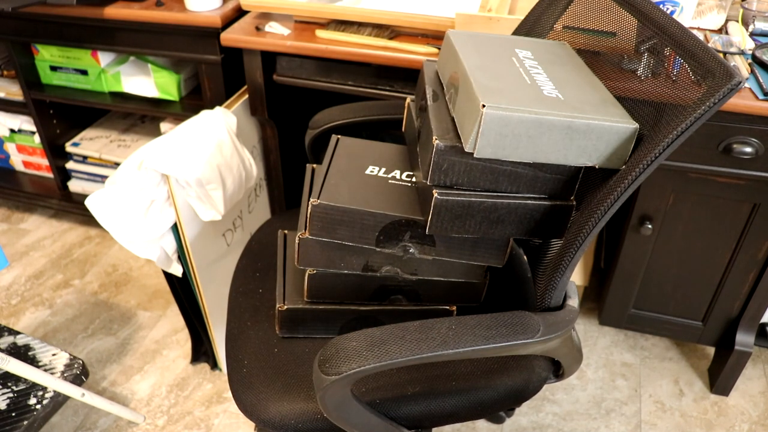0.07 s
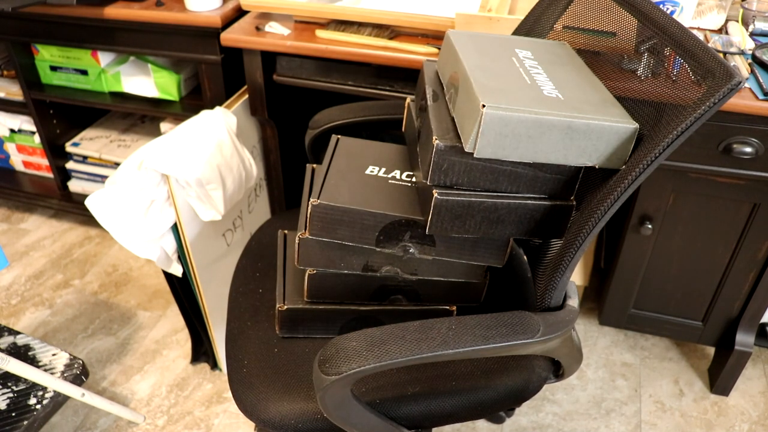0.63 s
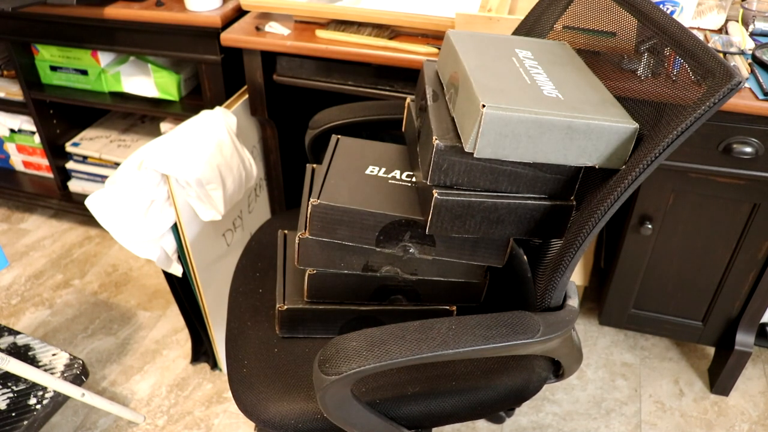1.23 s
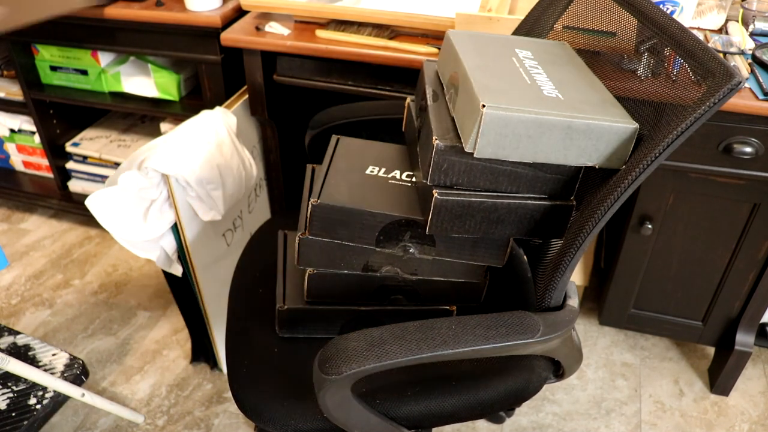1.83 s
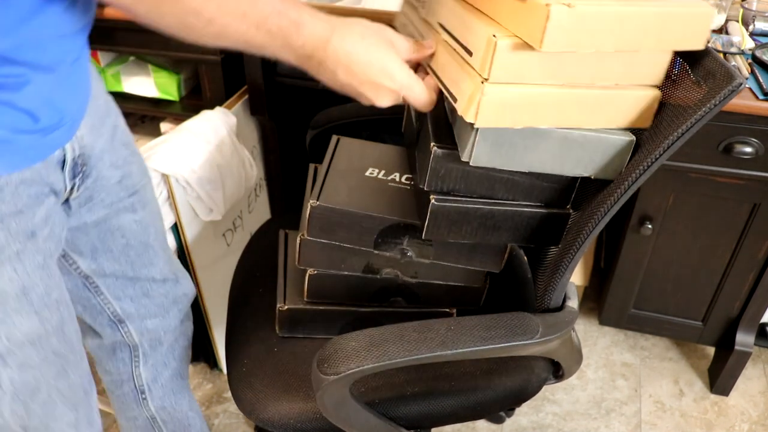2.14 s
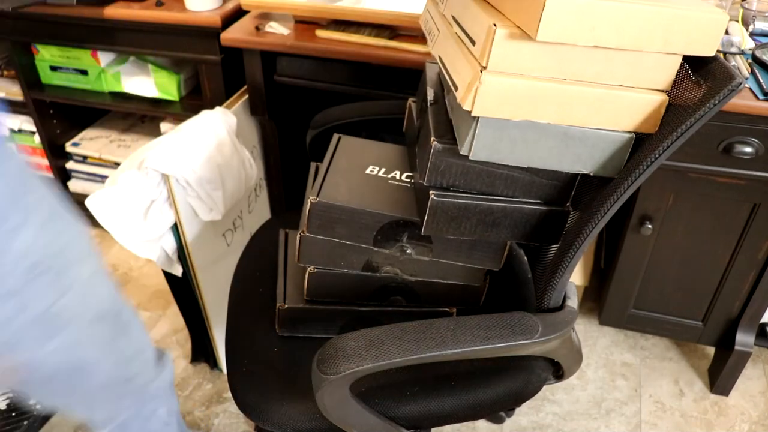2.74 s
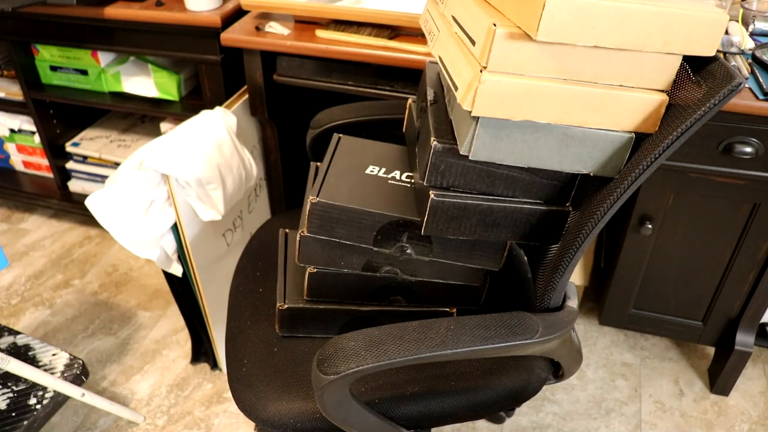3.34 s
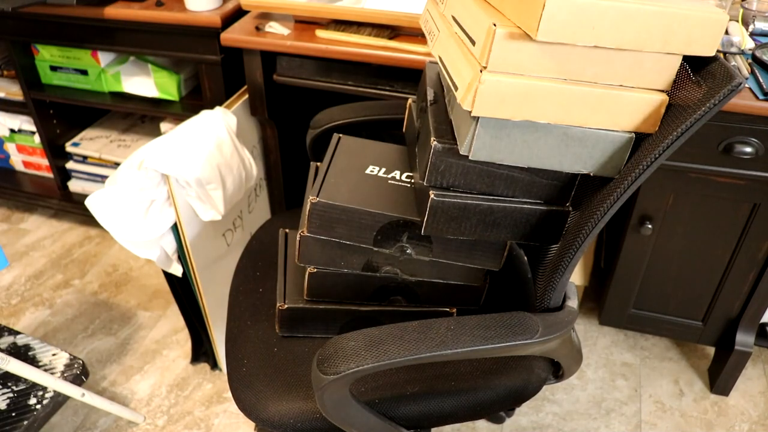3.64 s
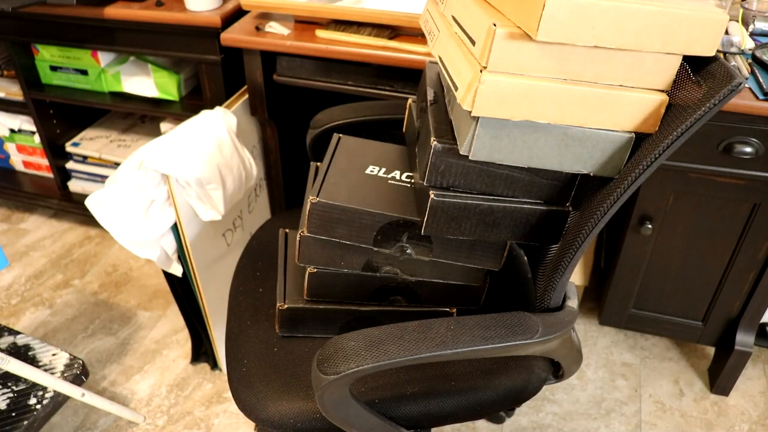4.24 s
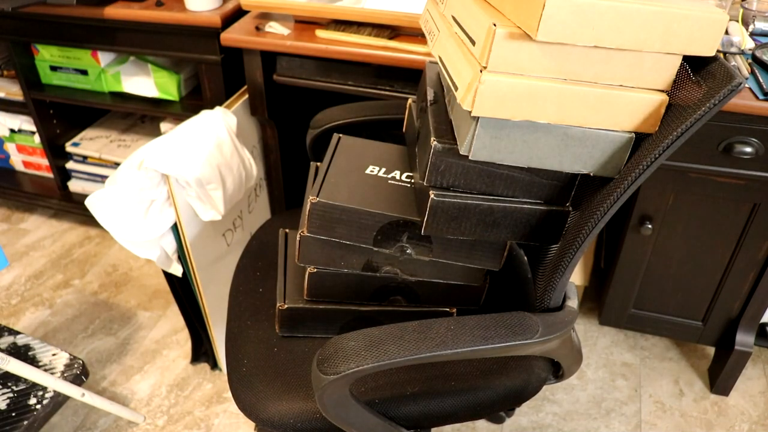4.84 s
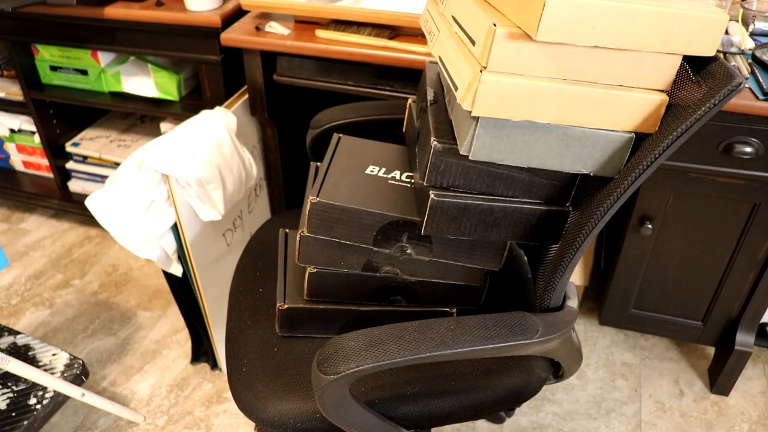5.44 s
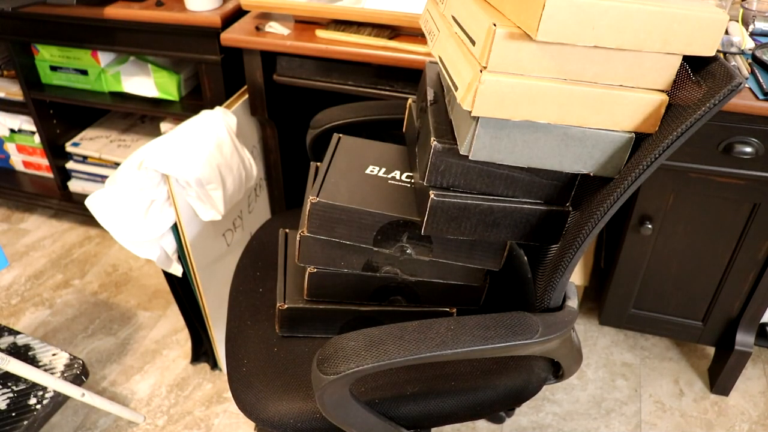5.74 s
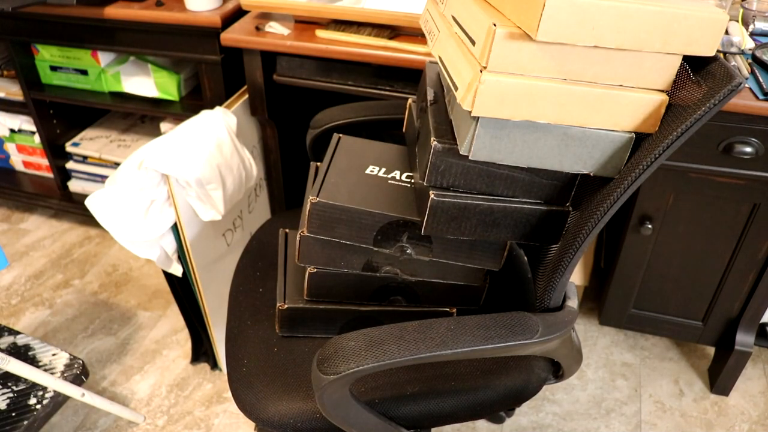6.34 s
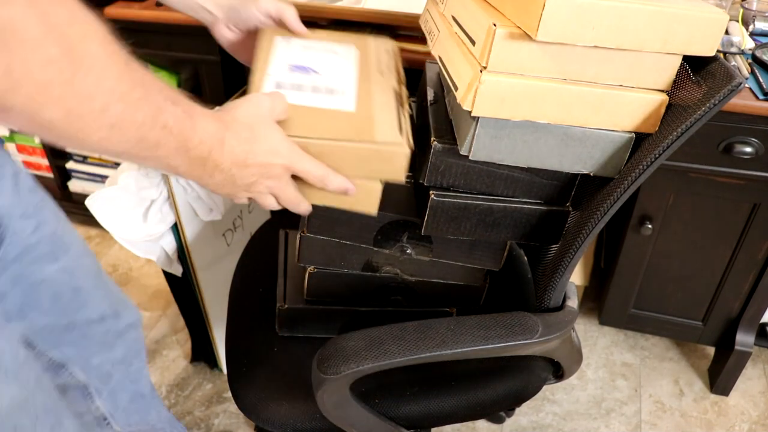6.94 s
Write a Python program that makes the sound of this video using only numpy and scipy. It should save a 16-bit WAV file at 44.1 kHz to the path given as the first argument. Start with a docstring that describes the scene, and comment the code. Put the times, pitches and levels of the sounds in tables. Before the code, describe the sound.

In a small furnished room, someone handles cardboard boxes with light taps, dull bumps and rustling clothes. One box knocks down, card slides with a tiny squeak, and more boxes land on the pile in a quick clatter. After a quieter pause comes another hollow knock, then scattered taps and brushing. A fan hums faintly throughout, and the sound is fairly close and dry.

```python
"""Cardboard boxes are picked up and stacked on an office chair in a small furnished room.
Each hollow blow is a push plus the chatter of card settling on card, coloured by the box, with a
brief panel ring. Light taps, dull bumps and one stick-slip squeak fall in between. Sliding card and
brushing clothes make friction noise, flexing card crackles, and a fan hums steadily behind."""
import sys
import numpy as np
from scipy import signal
from scipy.fft import rfft, irfft, next_fast_len
from scipy.io import wavfile
from scipy.ndimage import uniform_filter1d, map_coordinates

SR = 44100
rng = np.random.default_rng(int(sys.argv[2]) if len(sys.argv) > 2 else 0)


def generate_wav(signal):
    """Clip the signal to [-1, 1] and save it as 16-bit WAV at the path in sys.argv[1]."""
    frames = np.transpose(np.atleast_2d(signal))
    scaled = np.clip(frames, -1, 1) * 32767
    pcm = np.round(scaled).astype(np.int16)
    wavfile.write(sys.argv[1], SR, pcm)


N = 308700

# Panel modes. Each row: frequency in Hz, relative level in dB.
LID_MODES = [(721.4, -43), (1927, -43), (2519, -40), (2972, -50), (3122, -50), (3924, -45)]
STACK_MODES = [(489.9, -40), (651.4, -35), (694.4, -36), (812.9, -38), (936.7, -36), (1130, -39),
               (1308, -34), (1400, -37), (1567, -38)]
# Struck boxes. Each holds: clatter spectrum and panel modes (both rows of Hz, dB), ring T60 in seconds,
# ring level against the clatter in dB, room tail gain in dB.
LID = [(120, -81), (330, -12), (420, -24), (720, 2.5), (1150, -6.5), (2000, 0), (2550, 0), (2900, -7.5),
       (4000, -5.5), (4400, -10.5), (15500, -27.5)], LID_MODES, 0.072, -6, -1.5
STACK = [(25, -36), (70, -30), (300, -28), (420, -12), (620, 0.5), (1050, -4), (1300, -6.5), (2100, -10),
         (4600, -14.5), (11500, -14.5), (15500, -25)], STACK_MODES, 0.096, -1.5, 0.5
FLANK = [(59, -71), (100, -33), (228, -15), (355, -18), (627, -6.5), (758, -16), (998, -4), (1880, -17.5),
         (2090, -10), (2270, -15), (5170, -15), (15500, -20.5)], [(1012, -2), (2089, -9)], 0.066, -13, 3.2
HOLLOW = ([(30, -75), (70, -52), (140, -26), (210, -12.5), (280, -1.5), (376, -8), (486, -3),
           (657, -6.5), (1200, -1.5), (2100, -11.5), (3580, -22.5), (4850, -20), (6710, -35),
           (15500, -61)],
          [(279.9, -38), (500.6, -35), (608.3, -35), (866.7, -33), (1066, -47), (1184, -55),
           (1351, -44), (1427, -57), (1545, -40), (2094, -41), (2326, -38)], 0.082, -9, -1)
# Each row: start in seconds, level in dB, rise in seconds, chatter T60 in seconds, box.
BLOWS = [ (1.278, -20.5, 0.0052, 0.078, LID), (2.1485, -20, .0012, 0.094, STACK),
         (2.1669, -19.5, 0.0013, 0.089, STACK), (2.177, -20, .0054, 0.082, STACK),
         (2.176, -27.5, 0.0061, .2, FLANK), (2.517, -25.5, 0.014, 0.072, FLANK),
         (2.526, -27, 0.0062, 0.051, FLANK), (4.507, -30.5, .004, 0.2, FLANK),
         (4.5266, -17.5, 0.0053, 0.068, HOLLOW), (4.529, -30.5, 0.0016, 0.027, LID),
         (4.548, -24.5, 0.0052, 0.1, HOLLOW)]
# Each row: start in seconds, knock level in dB, panel pitch in Hz, edge tick against the knock in dB.
TAPS = [(0.045, -52, 657, 5), (0.52, -43, 483, -11.5), (0.612, -43, 630, -2), (0.687, -46.5, 1550, -0.5),
        (0.811, -41.5, 625, -5), (1.492, -47, 706, 3.5), (1.603, -40.5, 715, -7), (2.845, -44.5, 610, 8.5),
        (3.083, -43.5, 900, -4), (5.155, -37.5, 1520, -14), (5.414, -42.5, 503, -11),
        (5.609, -46, 1210, -3.5), (5.987, -43, 1160, 0), (6.179, -43.5, 780, -6.5),
        (6.587, -40.5, 650, -24), (6.641, -43.5, 1900, 4), (6.672, -33, 1730, -8.5),
        (6.697, -39.5, 650, -16)]
# Each row: start in seconds, level in dB.
BUMPS = [(0.855, -41), (0.878, -34.5), (5.159, -47)]
# Rubs of hands, card and clothes. Each row: centre in seconds, half-length in seconds, swish in dB.
STROKES = [(0.872, 0.036, -42.5), (1.087, .02, -38.5), (1.42, 0.022, -40), (1.897, 0.039, -37.5),
           (2.084, 0.021, -29.5), (2.244, 0.012, -33), (2.93, 0.013, -37.5), (3.645, 0.024, -51.5),
           (3.86, 0.033, -51.5), (4.697, 0.024, -49.5), (4.786, 0.035, -46.5), (4.947, 0.016, -47.5),
           (5.039, 0.017, -32.5), (5.095, 0.031, -48), (5.139, 0.015, -37.5), (5.337, 0.036, -50.5),
           (5.445, 0.044, -53.5), (5.883, 0.024, -52), (5.98, 0.026, -49), (6.371, 0.026, -43)]
# Body movement: carry, let go, stand still, move again. Each row: time in seconds, rustle level in dB.
EFFORT = [(0.22, -64), (0.35, -51.5), (0.47, -54.5), (0.64, -53), (0.98, -53), (1.33, -44.5), (1.7, -47.5),
          (1.88, -40), (2.01, -47), (2.13, -40), (2.31, -44), (2.41, -63.5), (2.77, -55.5), (3.02, -52.5),
          (3.2, -61.5), (6.12, -58), (6.62, -42), (7.0, -50.5)]
# Each row: time in seconds, pitch in Hz, level in dB.
SQUEAK_PATH = [(1.93, 3600, -70), (1.943, 3500, -47), (1.958, 3100, -41), (1.985, 3450, -49),
               (2.01, 3500, -70)]
# Source spectra; the knock is for a panel at KNOCK_REF_HZ. Each row: frequency in Hz, density in dB.
KNOCK_SPECTRUM = [(200, -48), (450, -7.5), (800, 0), (1000, 5), (1250, -7), (2200, -6), (6000, -29.5)]
TICK_SPECTRUM = [(800, -67), (2000, -2.5), (3500, 9), (6500, 1), (15000, -5)]
THUMP_SPECTRUM = [(30, -42), (90, -16), (170, -25), (255, 0.5), (380, -6), (700, -7.5), (2000, -89)]
SCRAPE_SPECTRUM = [(300, -52), (700, -3.5), (1400, -3), (2200, -5.5), (4000, -6.5), (6000, -11.5),
                   (15000, -45)]
SWISH_SPECTRUM = [(1000, -50), (3000, -6), (5500, -5), (9000, -5), (15500, -6.5)]
CRACKLE_SPECTRUM = [(300, -24), (900, -0.5), (1800, -2.5), (3000, -3.5), (6000, -15), (15000, -29)]
FAN_AIR_SPECTRUM = [(15, -64), (25, -76), (91, -23.5), (144, -26), (188, -13), (227, -15.5), (340, -9),
                    (523, -9), (614, -9), (919, -12), (1080, -17), (1300, -15), (6730, -32), (11800, -32),
                    (15500, -39)]
# Motor and blade tones. Each row: frequency in Hz, level in dB.
FAN_TONES = [(97, -75), (200, -72.5), (345, -63), (619, -60), (636, -58), (727, -65), (829, -68),
             (942, -63), (960, -60)]
# Room decay. Each row: frequency in Hz, T60 in seconds.
ROOM_T60 = [(200, 0.13), (1200, 0.087), (4000, 0.15), (12000, 0.19)]
# Diffuse field. Each row: frequency in Hz, left-right correlation.
ROOM_COHERENCE = [(100, .98), (600, 0.95), (1400, 0.85), (2800, 0.29), (5500, 0.011), (15000, 0.035)]

BLOW_REF_RISE_S, CHATTER_DB_PER_DOUBLING = 0.0021, 10
TAP_REF_DB, TAP_RISE_S, TAP_T60_S, TAP_SHORTENING_DB_PER_DB = -42, 0.0017, 0.049, 0.55
KNOCK_REF_HZ, THUMP_VS_KNOCK_DB = 1000, -17.5
FIDGET_DB, FIDGET_PER_S, SCRAPE_VS_RUSTLE_DB = 3, 14, -1.5
STROKE_REF_HALF_S, SCRAPE_DB_PER_DOUBLING = 0.03, 8.5
CRACKLES_PER_S, CRACKLE_VS_RUSTLE_DB = 29, -6
FAN_AIR_DB = -49
CUTOFF_HZ = 15900


def blows():
    """Boxes meet: a clatter coloured by the box, plus the brief ring of its panels."""
    out, t = np.zeros((2, N)), np.arange(SR // 3) / SR
    for start_s, level_db, rise_s, t60_s, box in BLOWS:
        spectrum, modes, ring_t60_s, ring_db, room_db = box
        # flatter landing: slower rise, more chatter
        chatter_db = CHATTER_DB_PER_DOUBLING * np.log2(rise_s / BLOW_REF_RISE_S)
        force = contact(t, rise_s, t60_s, chatter_db)
        clatter = coloured(in_room(force, room_db), spectrum)
        ring = np.zeros((2, len(t)))
        for hz, mode_db in modes:
            gain = amp(mode_db + rng.normal(0, 1))
            # higher modes are further out of step between channels
            phase_cycles = rng.random() + hz * .00005 * rng.standard_normal((2, 1))
            ring += gain * np.sin(2 * np.pi * (hz * t + phase_cycles))
        ring *= envelope(t, rise_s, ring_t60_s)
        add(out, start_s, level_db, unit(clatter) + amp(ring_db) * unit(ring))
    return out


def contact(t, rise_s, t60_s, chatter_db):
    """Contact force: one push, then the grainy chatter of card settling on card."""
    push = t * np.exp(-t / .00004)
    grains = rng.standard_normal(len(t)) * amp(3.8 * rng.standard_normal(len(t)))
    chatter = unit_energy(grains * envelope(t, rise_s, t60_s))
    return unit_energy(push / push.sum() + amp(chatter_db) * chatter)


def taps():
    """Light contacts: panel knock, edge tick and faint hollow thump. Firmer taps end sooner."""
    out, t = np.zeros((2, N)), np.arange(SR // 4) / SR
    for start_s, knock_db, panel_hz, tick_db in TAPS:
        stretch = amp(-TAP_SHORTENING_DB_PER_DB * (knock_db - TAP_REF_DB))
        force = contact(t, TAP_RISE_S * stretch, TAP_T60_S * stretch, chatter_db=3.5)
        tap = in_room(force, room_db=4)
        panel_spectrum = np.array(KNOCK_SPECTRUM) * [panel_hz / KNOCK_REF_HZ, 1]
        add(out, start_s, knock_db, coloured(tap, panel_spectrum))
        add(out, start_s, knock_db + tick_db, coloured(tap, TICK_SPECTRUM))
        add(out, start_s, knock_db + THUMP_VS_KNOCK_DB, coloured(tap, THUMP_SPECTRUM))
    return out


def bumps():
    """Soft contacts on lifting excite only the hollow of a box."""
    out, t = np.zeros((2, N)), np.arange(SR // 4) / SR
    for start_s, level_db in BUMPS:
        force = contact(t, rise_s=0.0014, t60_s=0.032, chatter_db=3)
        add(out, start_s, level_db, coloured(in_room(force, room_db=6), THUMP_SPECTRUM))
    return out


def handling():
    """Clothes and card rustle and crackle with effort; strokes swell and fade, quicker is brighter."""
    t = np.arange(N) / SR
    rustle = amp(np.interp(t, *np.transpose(EFFORT)) + FIDGET_DB * wobble(FIDGET_PER_S))
    scrape, swish = amp(SCRAPE_VS_RUSTLE_DB) * rustle, rustle
    for centre_s, half_s, swish_db in STROKES:
        stroke = amp(swish_db) * np.exp(-.5 * np.minimum(((t - centre_s) / half_s) ** 2, 40))
        scrape_db = SCRAPE_DB_PER_DOUBLING * np.log2(half_s / STROKE_REF_HALF_S)
        swish = np.hypot(swish, stroke)
        scrape = np.hypot(scrape, stroke * amp(scrape_db))
    return (scrape * friction(SCRAPE_SPECTRUM, rough_db=1.6, grain_db=2.0, patchy_db=4.5)
            + swish * friction(SWISH_SPECTRUM, rough_db=2.5, grain_db=-1.5, patchy_db=0.5)
            + amp(CRACKLE_VS_RUSTLE_DB) * rustle * crackles())


def friction(spectrum, rough_db, grain_db, patchy_db):
    """Rubbing noise: pressure wavers, fibres catch, the moving contact excites shifting resonances."""
    noise = diffuse(N) * amp(rough_db * wobble(45) + grain_db * wobble(900))
    bins = signal.stft(noise, nperseg=512)[2]
    patches = uniform_filter1d(rng.standard_normal(bins.shape[1:]), size=3, axis=0)
    patches = uniform_filter1d(patches, size=6, axis=1)
    rubbed = signal.istft(bins * amp(patchy_db * unit(patches)), nperseg=512)[1][:, :N]
    return unit(coloured(rubbed, spectrum))


def crackles():
    """Flexing card snaps at random moments; rms 1."""
    snaps = (rng.random(N) < CRACKLES_PER_S / SR) * amp(4.2 * rng.standard_normal(N))
    return unit(coloured(in_room(snaps, room_db=7), CRACKLE_SPECTRUM))


def squeak():
    """Sliding card sticks and slips: one small raspy squeak."""
    t = np.arange(N) / SR
    times_s, path_hz, path_db = np.transpose(SQUEAK_PATH)
    pitch_hz = np.interp(t, times_s, path_hz) * (1 + .03 * wobble(900))
    tone = unit(np.sin(2 * np.pi * np.cumsum(pitch_hz) / SR))
    return np.interp(t, times_s, amp(path_db), left=0, right=0) * tone


def fan():
    """Steady air noise with slightly unsteady motor and blade tones."""
    t = np.arange(N) / SR
    out = amp(FAN_AIR_DB) * unit(coloured(diffuse(N), FAN_AIR_SPECTRUM))
    for hz, level_db in FAN_TONES:
        flutter = 1 + 0.49 * wobble(7)
        drift_rad = 1.06 * wobble(14)
        out += amp(level_db) * unit(flutter * np.sin(2 * np.pi * hz * t + drift_rad))
    return out


def in_room(x, room_db):
    """Mono to stereo: direct sound plus a fresh room tail, 2 ms later."""
    hz, t, bins = signal.stft(diffuse(len(x)), SR, nperseg=256)
    decay = amp(-60 * t / log_interp(ROOM_T60, hz)[:, None])
    tail = signal.istft(bins * decay, SR, nperseg=256)[1]
    tail = np.pad(unit_energy(tail), ((0, 0), (SR // 500, 0)))
    return x + amp(room_db) * signal.fftconvolve(x[None], tail, axes=1)[:, :len(x)]


def diffuse(n):
    """White stereo room noise: correlated in the bass, independent in the treble."""
    def mid_side_gains(hz):
        angle = np.arccos(np.clip(log_interp(ROOM_COHERENCE, hz), -1, 1)) / 2
        return np.array([np.cos(angle), np.sin(angle)])
    mid, side = filtered(rng.standard_normal((2, n)), mid_side_gains)
    return np.array([mid + side, mid - side])


def amp(db):
    """Decibels to gain."""
    return 10 ** (np.asarray(db) / 20)


def unit(x):
    """Scale to rms 1."""
    return x / np.sqrt(np.mean(x ** 2) + 1e-20)


def unit_energy(x):
    """Scale to a mean energy of 1 per channel."""
    return unit(x) / np.sqrt(x.shape[-1])


def envelope(t, rise_s, t60_s):
    """Exponential rise and decay."""
    return (1 - np.exp(-t / rise_s)) * amp(-60 * t / t60_s)


def log_interp(points, hz):
    """Interpolate (Hz, value) rows on a log frequency axis."""
    knots_hz, values = np.transpose(points)
    return np.interp(np.log(hz + 1), np.log(knots_hz + 1), values)


def wobble(knots_per_s):
    """Smooth random curve, N samples."""
    knots = rng.standard_normal(int(N * knots_per_s / SR) + 4)
    return map_coordinates(knots, [np.arange(N) * knots_per_s / SR])


def filtered(x, response):
    """Zero-phase filter; response maps Hz to gain."""
    size = next_fast_len(x.shape[-1] + 8192)
    return irfft(rfft(x, size) * response(np.fft.rfftfreq(size, 1 / SR)), size)[..., :x.shape[-1]]


def coloured(x, spectrum, size=4096):
    """Minimum-phase filter from (Hz, dB) rows."""
    gain = amp(log_interp(spectrum, np.fft.rfftfreq(size, 1 / SR)))
    cepstrum = irfft(np.log(gain))
    cepstrum[1:size // 2] *= 2
    cepstrum[size // 2 + 1:] = 0
    impulse = irfft(np.exp(rfft(cepstrum)))
    return signal.fftconvolve(x, impulse[None], axes=1)[:, :x.shape[-1]]


def add(track, start_s, level_db, sound):
    """Mix in a short sound; its level is its energy spread over 30 ms."""
    part = track[:, round(start_s * SR):][:, :sound.shape[1]]
    part += amp(level_db) * np.sqrt(.03 * SR) * unit_energy(sound)[:, :part.shape[1]]


def scene():
    """All sources, panned slightly left."""
    return (blows() + taps() + bumps() + handling() + squeak() + fan()) * amp([[.4], [-.4]])


def record(dry):
    """Brick-wall low-pass."""
    return filtered(dry, lambda hz: hz < CUTOFF_HZ)


dry = scene()
out = record(dry)
generate_wav(out)
```